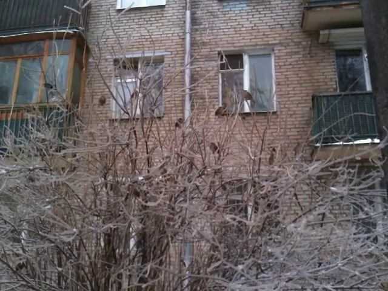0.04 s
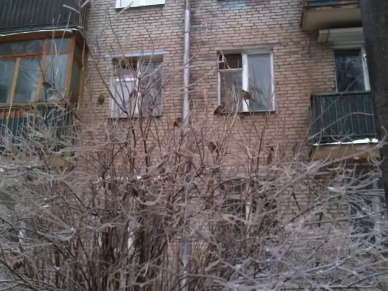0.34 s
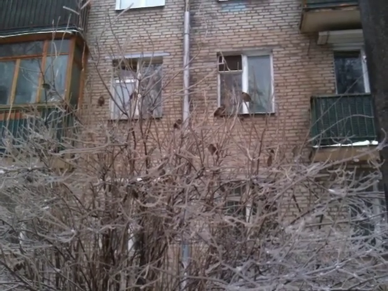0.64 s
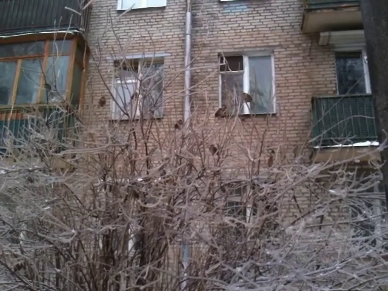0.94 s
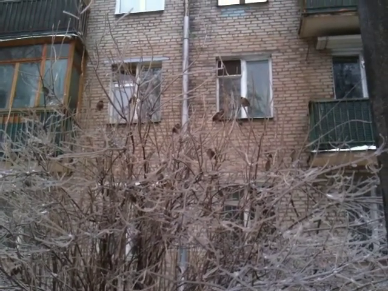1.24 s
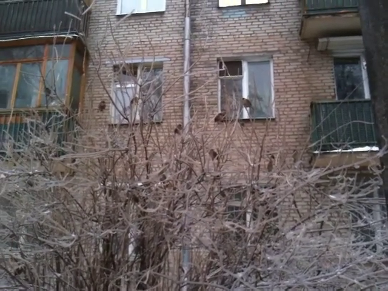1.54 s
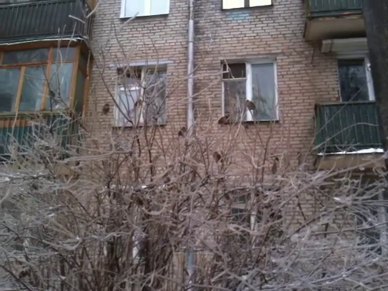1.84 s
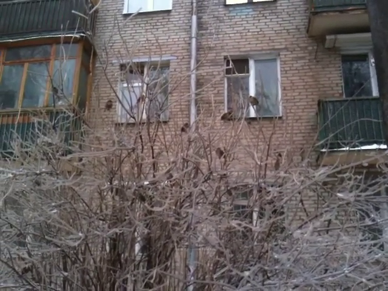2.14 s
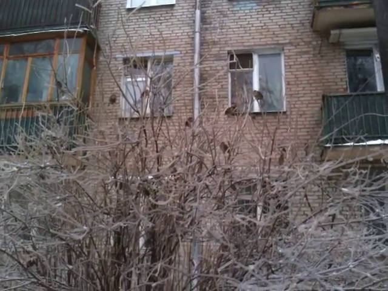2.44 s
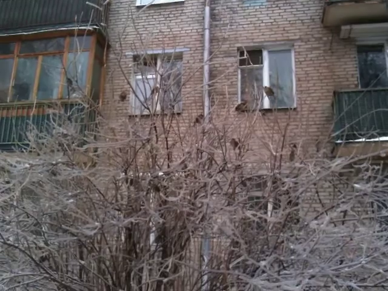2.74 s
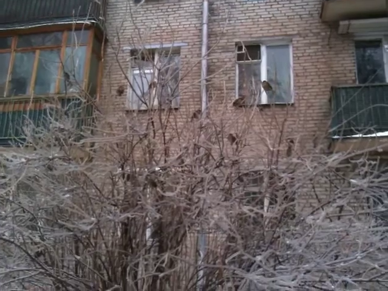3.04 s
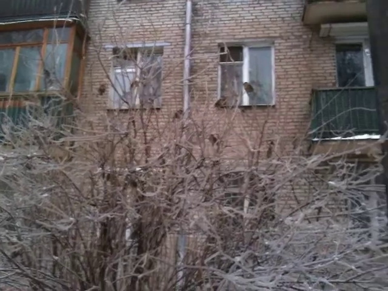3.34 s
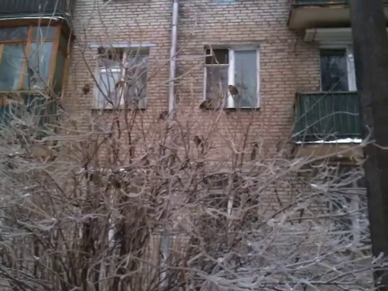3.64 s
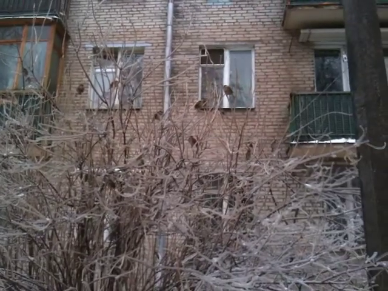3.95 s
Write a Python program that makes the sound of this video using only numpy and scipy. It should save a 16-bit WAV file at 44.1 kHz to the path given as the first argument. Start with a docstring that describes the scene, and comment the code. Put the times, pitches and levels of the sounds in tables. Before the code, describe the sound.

Many sparrows chatter nonstop outdoors, with short chirps, raspy calls and thin squeaks.

```python
"""Sparrows in bare bushes in front of a brick house, heard by one mono microphone.
From the start a faint town hum lies under the dense chatter of the flock. Near birds cut in at once
with short arched chirps, then harsh low calls and thin squeaks, all whistles that shake when rough.
From 0.75 s come soft thumps like wingbeats, a swell of rustle and the first twig tick. A few longer
falling notes and one last tick follow. Throughout, branches, wall and yard echo the voices."""
import sys
import numpy as np
from scipy import signal
from scipy.fft import rfft, irfft
from scipy.io import wavfile
from scipy.ndimage import uniform_filter1d

SR = 44100
rng = np.random.default_rng(int(sys.argv[2]) if len(sys.argv) > 2 else 0)


def put_to_file(sound):
    """Save the sound as 16-bit audio at rate SR, in the file named by the first command-line argument."""
    columns = np.atleast_2d(sound).T  # one column per channel
    safe = np.clip(columns, -1, 1)
    whole_steps = np.round(safe * 32767)
    wavfile.write(sys.argv[1], SR, whole_steps.astype(np.int16))


N = 176400  # 4 s


def undb(db):
    """Decibels to gain."""
    return 10 ** (np.asarray(db) / 20)


def unit(x):
    """Scale to rms 1."""
    return x / np.sqrt(np.mean(x ** 2))


def equalise(x, curve):
    """EQ by a curve of (frequency [Hz], gain [dB]) points."""
    hz, db = np.array(curve).T
    bins_hz = np.fft.rfftfreq(2 * N, 1 / SR) + 1
    gain = undb(np.interp(np.log(bins_hz), np.log(hz), db))
    return irfft(rfft(x, 2 * N) * gain)[:N]


def noise(curve):
    """Noise shaped by an EQ curve, at rms 1."""
    return unit(equalise(rng.standard_normal(N), curve))


def shake(hz):
    """Smooth random motion up to about hz, at rms 1."""
    return unit(signal.sosfilt(signal.butter(2, hz, fs=SR, output="sos"), rng.standard_normal(N)))


def add(out, start, sound):
    """Mix a short sound in at its time."""
    i = int(start * SR)
    a, b = max(i, 0), min(i + len(sound), N)
    if b > a:
        out[a:b] += sound[a - i:b - i]


# Tone of the town bed (frequency [Hz], gain [dB])
TOWN_EQ = [(25, -45), (50, -37), (90, -16), (150, -1), (220, 0.5), (400, -6.5), (800, -9), (1300, -10),
           (2200, -7), (6000, -12), (9000, -17.5), (12500, -26), (16000, -29)]
def town(level_db=-57.5):
    """A bed of distant hum and hiss, its level drifting slightly."""
    return undb(level_db + .5 * shake(hz=3.7)) * noise(TOWN_EQ)


def voice_tremor():
    """Random modulators of a voice: fast pitch and level shake, slower pitch and level waver."""
    return np.array([shake(hz=630), shake(hz=370), shake(hz=110), shake(hz=110)])


ATTACK_S, RELEASE_S = .0039, .00851
SAG, WOBBLE, WAVER = .094, .0662, .016  # shares of the pitch
def whistle(start, length, first_hz, mid_hz, last_hz, rough, tremor, partials_db=None):
    """One note arching through three pitches, sagging at both ends, shaken and brighter when rough."""
    t = np.arange(int(max(length, .005) * SR)) / SR
    u = t / t[-1]
    pitch_shake, level_shake, pitch_waver, level_waver = tremor[:, (int(start * SR) + np.arange(len(t))) % N]
    ramp = np.clip(np.minimum(t / ATTACK_S, (t[-1] - t) / RELEASE_S), 0, 1)
    env = np.sin(np.pi / 2 * ramp) ** 2
    unsteady = min(.35 + 2 * rough, 1)  # clear whistles waver least
    arch_hz = first_hz + (last_hz - first_hz) * u + (2 * mid_hz - first_hz - last_hz) * 2 * u * (1 - u)
    bend = 1 - SAG * (1 - env) + WOBBLE * rough * pitch_shake + WAVER * unsteady * pitch_waver
    phase = 2 * np.pi * np.cumsum(arch_hz * bend) / SR
    if partials_db is None:
        partials_db = [0, -28.5 + 9.5 * rough, -43 + 9.5 * rough]
    tone = sum(undb(db) * np.sin(k * phase) for k, db in enumerate(partials_db, 1) if k * mid_hz < SR / 2)
    flutter = undb(2.2 * unsteady * level_waver) * (1 + .59 * rough * level_shake)
    return env * flutter * tone


# Far chips, high squeaks and low calls (share of notes [0-1], pitch [ratio], relative level [dB])
FLOCK_VOICES = [(.76, 1, 0), (.14, 1.55, -16), (.1, .6, -15)]
# Tone of the far notes (frequency [Hz], gain [dB])
FLOCK_EQ = [(1000, -14), (2000, -3.5), (2600, -7), (3300, 0), (4000, -1), (5000, -2), (6500, 6.5),
            (9000, -11.5), (12000, -17), (16000, 3)]
# Tone of the blur of far harsh calls (frequency [Hz], gain [dB])
RASP_EQ = [(500, -16), (1200, -57), (1700, -24.5), (2500, -4.5), (3300, -5), (4500, 0.5), (6000, -5),
           (7300, -14.5), (9500, -16), (12000, -28), (16000, -62)]
# Fader ride on the flock, ahead of its trim (time [s], level [dB])
FLOCK_FADER = [(0, -46), (.2, -46), (.38, -45.5), (.58, -49), (.8, -47), (.95, -52), (1.1, -43),
               (1.28, -50), (1.38, -48), (1.5, -46.5), (1.62, -45), (1.73, -47.5), (1.85, -53), (1.96, -46),
               (2.08, -46), (2.28, -41.5), (2.42, -44), (2.55, -46), (2.7, -43), (2.83, -50), (2.92, -45),
               (3.02, -49), (3.2, -44.5), (3.34, -45), (3.5, -49.5), (3.7, -45.5), (3.86, -49.5),
               (3.94, -55.5), (4, -42)]
def flock(notes_per_s=165, note_s=.023, centre_hz=3761, rasp_db=-10, trim_db=1.68):
    """Many birds deeper in the bushes: a spray of brief notes, the farthest blurred into a rasp."""
    notes, tremor = np.zeros(N), voice_tremor()
    count = int(notes_per_s * (N / SR + .1))
    uniform = rng.random((count, 3))
    centred = 2 * np.tanh(rng.standard_normal((count, 4)) / 2)
    voices = rng.choice(FLOCK_VOICES, count, p=np.array(FLOCK_VOICES)[:, 0])
    for k, (_, ratio, db) in enumerate(voices):
        late, stretch, rough = uniform[k]
        pitch, arch, slope, accent = centred[k]
        start = (k + late) / notes_per_s - note_s
        length = note_s * (.5 + stretch) + RELEASE_S
        hz = centre_hz * ratio * np.exp(.19 * pitch)
        first, last = hz * np.exp(-.07 * (1 + arch) + .12 * slope * np.array([-1, 1]))
        note = whistle(start, length, first, hz, last, .35 * rough, tremor)
        add(notes, start, undb(db + 3.8 * accent) * note)
    chatter = unit(equalise(notes, FLOCK_EQ)) + undb(rasp_db) * noise(RASP_EQ)
    fader_db = np.interp(np.arange(N) / SR, *np.array(FLOCK_FADER).T)
    return chatter * undb(fader_db + trim_db)


# Foreground chirp cues
# (time [s], length [s], start pitch [Hz], mid pitch [Hz], end pitch [Hz], level [dB], roughness [0-1])
CHIRP_CUES = [ (0.032, 0.019, 3480, 3650, 3220, -39.5, 0.2), (0.058, 0.048, 4130, 4530, 4280, -47, 0.77),
              (0.093, 0.019, 3490, 3250, 3240, -37.5, 0), (0.117, 0.043, 3160, 3800, 4220, -43, 0.28),
              (0.255, 0.037, 3675, 4350, 3000, -40, 0.4), (0.314, 0.053, 4400, 5300, 5100, -50, 0.33),
              (0.34, 0.032, 3940, 4080, 4030, -33.5, 0.2), (0.372, 0.06, 4580, 4550, 4340, -42, 0.36),
              (0.393, 0.023, 4250, 3800, 3250, -39.5, .2), (0.451, 0.013, 6200, 6000, 5700, -40.5, 0.42),
              (0.506, 0.051, 4080, 4890, 4390, -45, 0.87), (.58, .052, 3260, 2500, 3080, -52.5, .3),
              (0.614, 0.086, 4150, 4250, 4340, -44.5, 0.28), (0.664, 0.04, 4800, 5800, 7300, -50, 0.5),
              (0.687, 0.02, 3410, 4030, 4170, -40.5, 0.3), (0.714, 0.087, 3300, 3055, 3120, -44, 0.56),
              (0.794, 0.03, 4000, 4330, 5000, -37, 0.12), (0.804, 0.056, 3314, 2820, 3270, -45.5, 0.57),
              (0.852, 0.053, 3680, 5210, 5140, -49.5, 0.42), (0.909, 0.024, 5610, 4950, 4400, -40, 0),
              (0.976, 0.022, 3770, 3880, 4040, -36.5, 0), (0.998, 0.04, 6880, 6700, 6830, -49, 0.5),
              (1.017, 0.031, 5030, 5780, 5800, -43, 0.5), (1.033, 0.031, 4150, 4330, 4180, -38.5, 0.2),
              (1.064, 0.017, 3270, 3430, 3380, -39, 0), (1.074, 0.034, 4600, 4850, 4660, -35.5, 0.13),
              (1.132, 0.013, 4510, 4550, 4520, -34, 0), (1.167, 0.018, 4050, 3950, 3800, -46, 0.1),
              (1.199, 0.026, 3510, 3884, 4140, -38.5, 0.13), (1.228, 0.048, 3634, 3850, 4120, -39.5, 0),
              (1.274, 0.029, 3880, 3200, 2700, -43, 0.13), (1.304, 0.06, 3795, 3950, 3670, -40.5, 0.34),
              (1.322, 0.062, 6970, 5630, 5040, -46, 0.9), (1.357, 0.043, 4400, 4136, 3450, -33.5, 0.05),
              (1.379, 0.11, 4750, 4394, 4290, -40, 0), (1.42, 0.023, 3430, 3470, 3350, -36.5, 0),
              (1.441, .028, 4210, 4250, 4400, -37, 0.1), (1.484, 0.071, 4170, 4300, 3970, -44, 0.4),
              (1.542, 0.036, 4720, 5160, 5700, -42.5, 0.5), (1.537, 0.046, 3230, 3400, 3870, -42, 0.24),
              (1.576, 0.056, 3610, 4070, 4020, -39, 0.65), (1.616, 0.027, 3730, 3555, 3460, -35, 0.37),
              (1.633, 0.082, 4320, 3650, 3020, -43, 0.7), (1.738, 0.15, 4320, 4150, 4300, -43.5, 0.17),
              (1.757, 0.041, 3840, 3780, 3300, -42, 0.1), (1.849, 0.033, 4226, 3900, 4440, -39, 0.5),
              (1.888, 0.031, 3280, 3990, 4800, -43, 0.3), (1.917, 0.083, 4500, 4295, 4290, -42, 0),
              (2.003, 0.03, 4050, 4180, 4200, -39.5, 0.33), (2.034, 0.058, 3950, 3350, 2780, -46.5, 0.2),
              (2.122, 0.026, 4390, 4850, 5500, -36, 0.37), (2.125, 0.029, 3580, 3750, 3430, -44.5, 0.3),
              (2.162, 0.053, 3450, 3450, 3410, -43, 0), (2.182, 0.043, 4680, 5070, 4600, -45, 0.83),
              (2.218, 0.035, 3480, 3770, 3220, -39, 0.35), (2.264, 0.018, 3800, 3590, 3550, -39, .1),
              (2.287, 0.029, 3710, 3753, 3600, -36, 0.3), (2.334, 0.035, 4440, 5400, 5800, -45, 0.23),
              (2.367, 0.03, 4590, 4580, 4510, -35.5, 0), (2.368, 0.033, 4060, 3900, 3650, -40, 0.08),
              (2.439, 0.043, 3980, 3850, 4170, -40.5, 0.7), (2.448, 0.024, 6120, 6180, 6150, -44.5, 0),
              (2.469, 0.027, 4190, 5150, 5340, -42, 0.03), (2.489, 0.014, 5270, 4400, 3900, -44, 0.1),
              (2.507, 0.019, 4220, 4480, 4620, -37.5, 0.12), (2.58, 0.042, 4270, 4700, 4650, -45, 0.1),
              (2.591, 0.063, 3710, 3516, 3520, -41, 0.1), (2.661, 0.0314, 4050, 4250, 3480, -37.5, 0),
              (2.686, 0.086, 3650, 3580, 3540, -41.5, 0.33), (2.815, 0.075, 3530, 3330, 3420, -43.5, 0.7),
              (2.884, 0.039, 3315, 4010, 3860, -36.5, 0.19), (2.885, 0.046, 3230, 2760, 3000, -43, 0.7),
              (2.927, 0.038, 3750, 4330, 4300, -39, 0.12), (2.955, 0.025, 4010, 4100, 4700, -41, 0.37),
              (2.981, 0.14, 5200, 4530, 4326, -45, 0.11), (3.064, 0.025, 3480, 3380, 3330, -40, 0.08),
              (3.1, 0.044, 2980, 3130, 3220, -41.5, 0.1), (3.139, 0.057, 3860, 4260, 3870, -35.5, 0.4),
              (3.159, 0.042, 5530, 5900, 5630, -48, 0.6), (3.172, 0.034, 2865, 3130, 3500, -41, 0.08),
              (3.204, 0.025, 3720, 4090, 4300, -35, 0.42), (3.235, 0.013, 4400, 4340, 4000, -39, 0.1),
              (3.284, 0.051, 3736, 3450, 3470, -40, 0.1), (3.311, 0.043, 3810, 4500, 4070, -38.5, 0.33),
              (3.346, 0.025, 2570, 2700, 3000, -49, 0), (3.379, 0.031, 3226, 3500, 4000, -41, 0.4),
              (3.407, 0.026, 3950, 4300, 4740, -39, 0.2), (3.42, 0.036, 3576, 3616, 3540, -41, 0),
              (3.422, 0.093, 2040, 2400, 2640, -53.5, 0.2), (3.475, 0.017, 2930, 3380, 3430, -49, 0),
              (3.556, 0.095, 5630, 5690, 5470, -40, 0.5), (3.581, 0.018, 5450, 5560, 5700, -36, 0),
              (3.584, 0.12, 3200, 3390, 3390, -42.5, 0.24), (3.647, 0.035, 4400, 5080, 4040, -37, 0.3),
              (3.662, 0.037, 4100, 3970, 3720, -37.5, 0.4), (3.703, 0.054, 3474, 3295, 3280, -42, 0.9),
              (3.756, 0.036, 3284, 3500, 3700, -41.5, 0.52), (3.761, 0.034, 4310, 4600, 4240, -47, 0.55),
              (3.812, 0.042, 3370, 3645, 3400, -39, 0), (3.936, 0.026, 5280, 5630, 5300, -43.5, 0.4),
              (3.96, 0.041, 3975, 4710, 5200, -43.5, 0.54), (3.986, 0.025, 3100, 3220, 3300, -49, 0.1)]
def chirps(tremor):
    """Short arched whistles and a few longer falling notes, from pure to gritty."""
    out = np.zeros(N)
    for start, length, first, mid, last, db, rough in CHIRP_CUES:
        add(out, start, undb(db) * whistle(start, length, first, mid, last, rough, tremor))
    return out


def glides(cues, tremor, rough, partials_db=None):
    """Play a cue list of whistles that slide from one pitch to another."""
    out = np.zeros(N)
    for start, length, first, last, db in cues:
        note = whistle(start, length, first, (first + last) / 2, last, rough, tremor, partials_db)
        add(out, start, undb(db) * note)
    return out


# Harmonics of a harsh call, from the fundamental up (gain [dB])
HARSH_PARTIALS = [2.5, -2, -3, -8.5, -15]
# Harsh call cues (time [s], length [s], start pitch [Hz], end pitch [Hz], level [dB])
HARSH_CUES = [(0.125, 0.053, 1334, 1700, -65), (0.527, 0.073, 2100, 2250, -59.5),
              (0.705, .08, 1470, 2400, -63), (0.773, 0.067, 2050, 2760, -57.5),
              (0.926, 0.1, 1950, 2102, -62), (1.407, 0.035, 2130, 2650, -56),
              (1.596, 0.057, 1488, 2000, -59.5), (1.88, 0.069, 1730, 2360, -66),
              (2.065, 0.061, 1330, 1785, -61), (2.139, 0.12, 1500, 2310, -65.5),
              (2.221, 0.066, 1517, 2586, -59), (2.33, .06, 1346, 1950, -64.5),
              (2.406, 0.075, 1810, 2460, -59), (2.732, 0.072, 1417, 2240, -61),
              (2.884, 0.08, 1900, 1286, -58), (2.909, 0.053, 1398, 1987, -57.5),
              (2.998, 0.078, 1284, 1800, -61), (3.577, 0.072, 1655, 1920, -63),
              (3.743, 0.059, 1695, 2300, -58.5), (3.784, .1, 1607, 2510, -66),
              (3.907, 0.093, 1920, 2197, -59)]
def harsh_calls(tremor):
    """Raspy calls, mostly rising, with strong harmonics on a low fundamental."""
    return glides(HARSH_CUES, tremor, rough=.724, partials_db=HARSH_PARTIALS)


# Squeak cues (time [s], length [s], start pitch [Hz], end pitch [Hz], level [dB])
SQUEAK_CUES = [(0.185, 0.05, 7100, 7400, -59), (0.311, 0.08, 6930, 6060, -58),
               (0.585, 0.053, 6480, 6950, -54.5), (0.864, 0.058, 11700, 10260, -61),
               (1.11, 0.032, 6900, 6300, -63), (1.514, 0.039, 8200, 8600, -54.5),
               (1.6, 0.027, 8180, 8770, -52.5), (1.762, 0.043, 8260, 9100, -58),
               (1.993, 0.043, 6640, 7600, -54.5), (2.012, 0.034, 6250, 5920, -49),
               (2.225, 0.034, 5470, 6240, -49), (2.272, 0.014, 6200, 8300, -45),
               (2.288, 0.027, 7450, 6900, -54), (2.548, 0.04, 5600, 5950, -49.5),
               (3, 0.0354, 6400, 6260, -50.5), (3.133, 0.074, 8920, 9600, -56),
               (3.27, 0.028, 7200, 8500, -57), (3.285, 0.051, 6500, 5800, -53),
               (3.553, 0.096, 10800, 11060, -64), (3.677, 0.051, 5430, 6200, -48.5),
               (3.739, 0.02, 6600, 8430, -53)]
def squeaks(tremor):
    """Thin, grainy slides high above the chirps."""
    return glides(SQUEAK_CUES, tremor, rough=.66)


# Tone of the hiss on the near notes (frequency [Hz], gain [dB])
SIZZLE_EQ = [(1500, -28), (3000, -2), (5500, 16.5), (7500, -2), (10000, 8.5), (13000, -37), (16000, -21)]
def near_birds(sizzle_db=-21.5, follow_s=.0089):
    """The closest sparrows together, with a little hiss following their envelope."""
    tremor = voice_tremor()
    voices = chirps(tremor) + harsh_calls(tremor) + squeaks(tremor)
    env = uniform_filter1d(np.abs(voices), int(follow_s * SR))
    return voices + undb(sizzle_db) * env * noise(SIZZLE_EQ)


# Body of a wing thump (frequency [Hz], gain [dB])
THUMP_EQ = [(40, -36), (90, -19), (150, 5), (260, -2), (380, -14), (1000, -19.5), (3000, -45)]
# Wing thump cues, ahead of the low cut (time [s], length [s], level [dB])
THUMP_CUES = [(0.75, 0.089, -55.5), (0.972, 0.031, -52.5), (1.109, 0.031, -57.5), (1.269, 0.046, -55.5),
              (1.344, 0.084, -56.5), (1.448, 0.031, -49.5), (1.766, 0.086, -57), (1.794, 0.024, -61)]
def wings(rustle_peak_s=1.39, rustle_width_s=.36, rustle_db=-63.5):
    """Soft puffs of air and a brief rustle as birds change perch."""
    t, env = np.arange(N) / SR, np.zeros(N)
    for start, length, db in THUMP_CUES:
        add(env, start, undb(db) * signal.windows.tukey(int(length * SR), .6))
    puffs = equalise(env * noise(THUMP_EQ), [(50, -15), (120, -1)])  # low cut
    rustle = noise([(60, -32), (200, 15), (450, 10), (1100, 10), (2500, -16), (8000, -37)])
    swell = np.exp(-((t - rustle_peak_s) / rustle_width_s) ** 2)
    return puffs + undb(rustle_db) * swell * rustle


# Twig tick cues (time [s], level [dB])
TICK_CUES = [(1.035, -58), (1.355, -59), (2.96, -54)]
def twigs(decay_s=.017):
    """Faint ticks in the branches: bright noise with a hard attack and a fast decay."""
    t, env = np.arange(SR // 10) / SR, np.zeros(N)
    for start, db in TICK_CUES:
        add(env, start, undb(db) * np.exp(-t / decay_s))
    return env * noise([(1000, -16), (5000, 4), (15000, -7)])


BRANCH_S, BRANCH_DB, WALL_S, WALL_DB, YARD_T60_S = .011, -10.5, .034, -14, .46
def yard(x, tail_db):
    """Early scatter from branches and ground, a slap off the house wall and a short diffuse tail."""
    t = np.arange(SR) / SR
    build_up = 1 - np.exp(-t / .019)
    tail = unit(rng.standard_normal(SR) * 1000 ** (-t / YARD_T60_S) * build_up)
    scatter = unit(rng.standard_normal(SR) * np.exp(-t / BRANCH_S))
    response = (undb(tail_db) * tail + undb(BRANCH_DB) * scatter) / np.sqrt(SR)
    response[0] += 1  # direct sound
    response[int(WALL_S * SR)] += undb(WALL_DB)
    return signal.fftconvolve(x, response / np.linalg.norm(response))[:N]


def scene():
    """The mix, the same in both channels: the flock sits wetter than the near birds."""
    birds = yard(near_birds(), tail_db=-8) + yard(flock(), tail_db=-4.5)
    mono = birds + wings() + twigs() + town()
    return np.array([mono, mono])


def record(dry, top_hz=15800):
    """The recorder cuts the top with a steep low-pass."""
    return signal.sosfilt(signal.ellip(10, .2, 70, top_hz, fs=SR, output="sos"), dry)


dry = scene()
out = record(dry)
put_to_file(out)
```